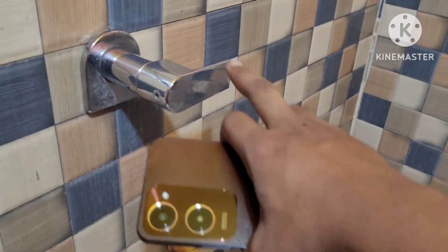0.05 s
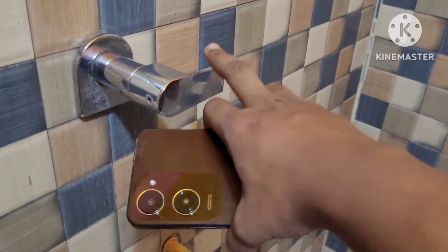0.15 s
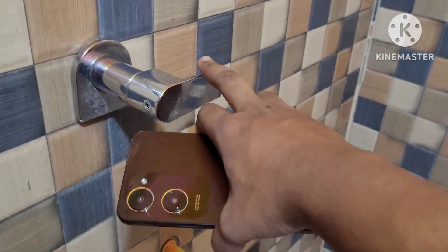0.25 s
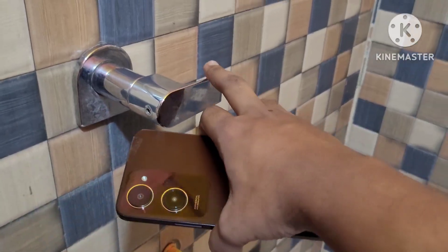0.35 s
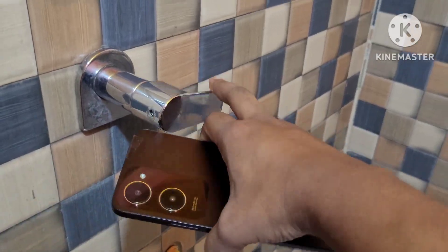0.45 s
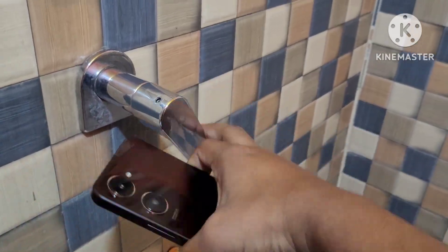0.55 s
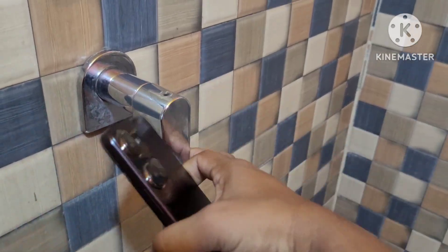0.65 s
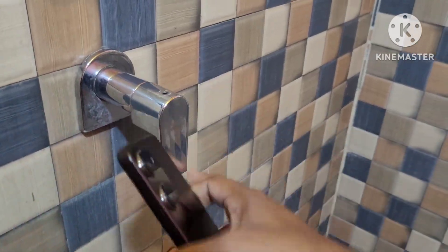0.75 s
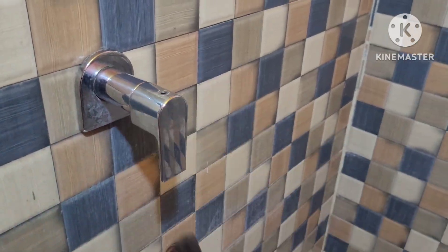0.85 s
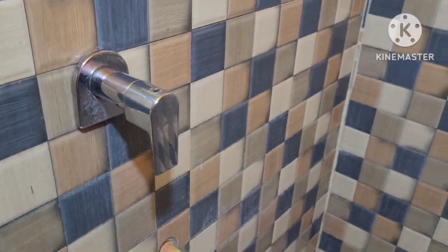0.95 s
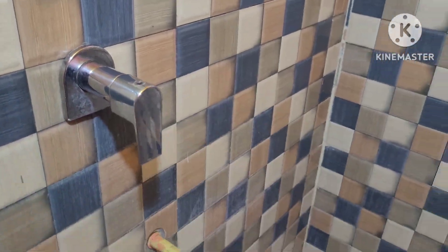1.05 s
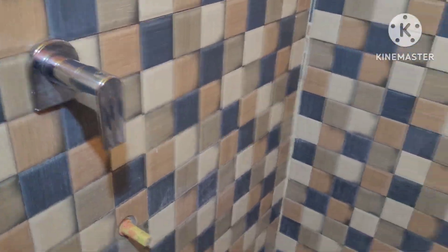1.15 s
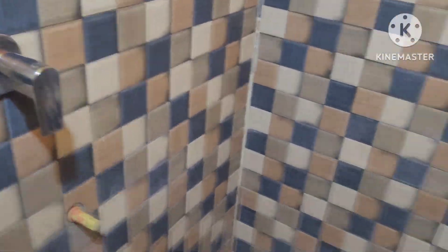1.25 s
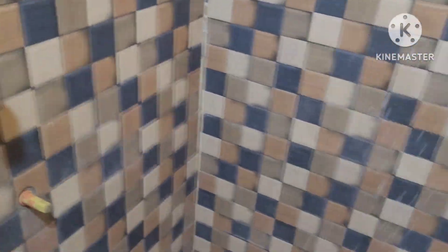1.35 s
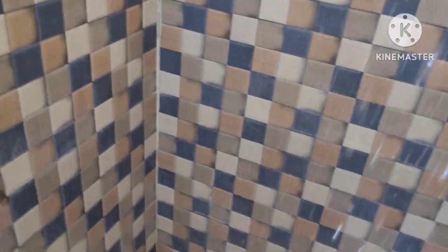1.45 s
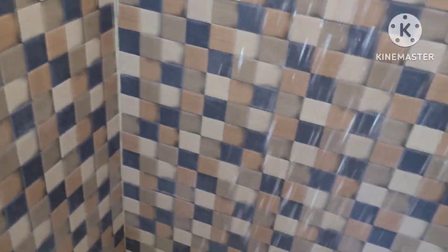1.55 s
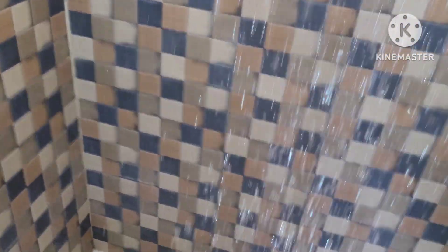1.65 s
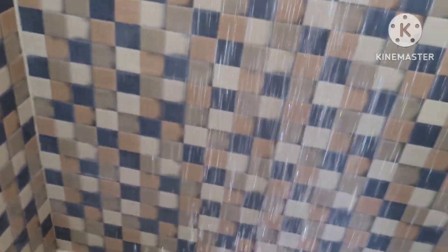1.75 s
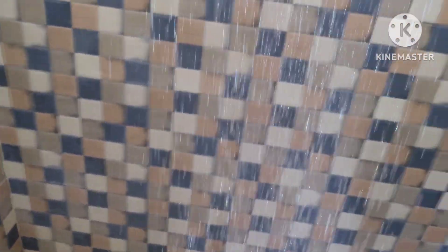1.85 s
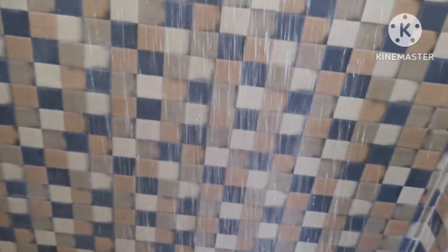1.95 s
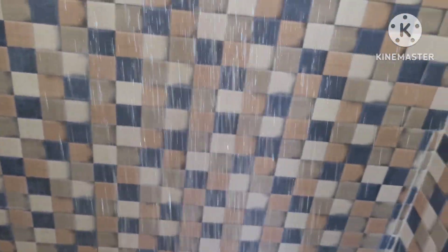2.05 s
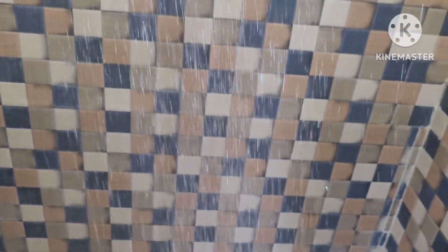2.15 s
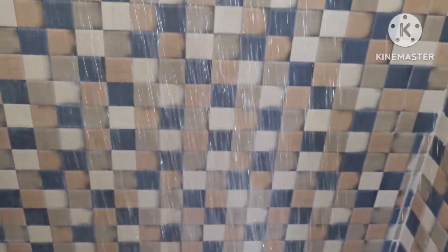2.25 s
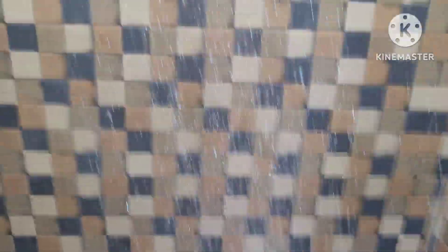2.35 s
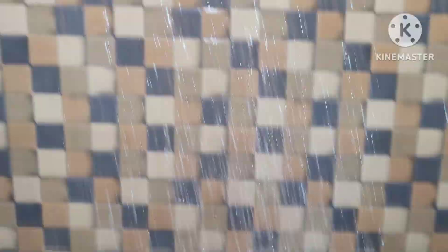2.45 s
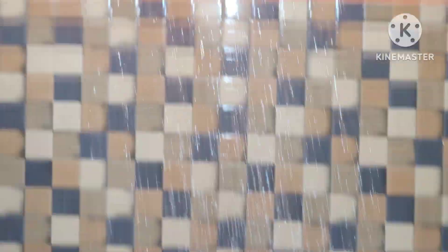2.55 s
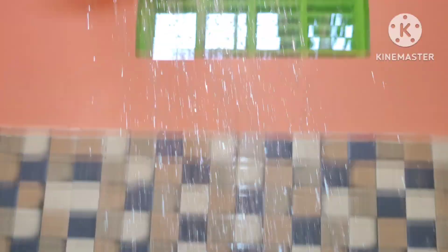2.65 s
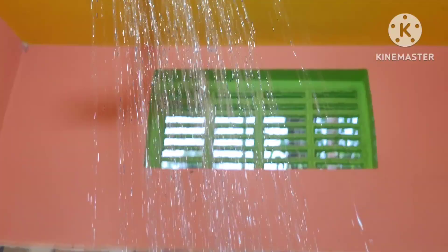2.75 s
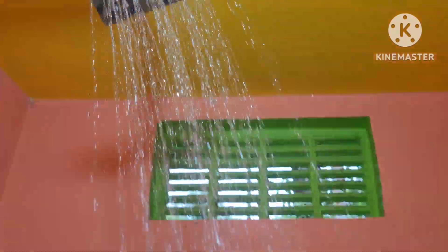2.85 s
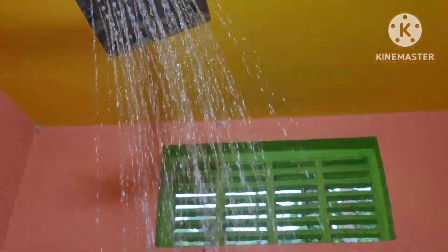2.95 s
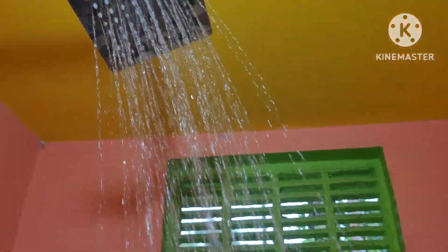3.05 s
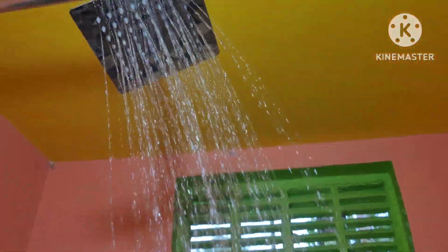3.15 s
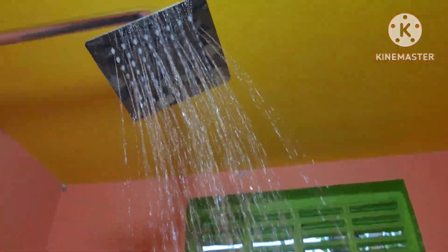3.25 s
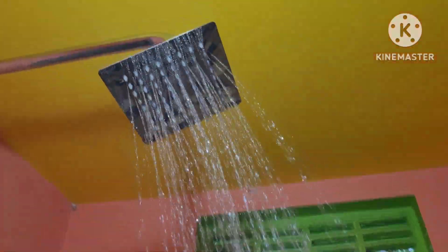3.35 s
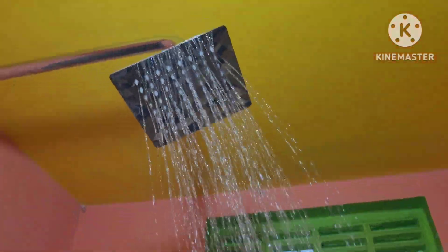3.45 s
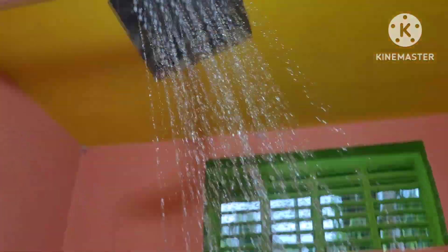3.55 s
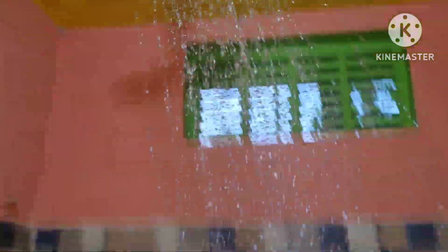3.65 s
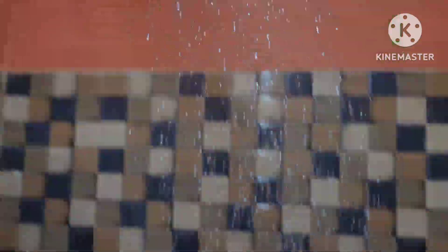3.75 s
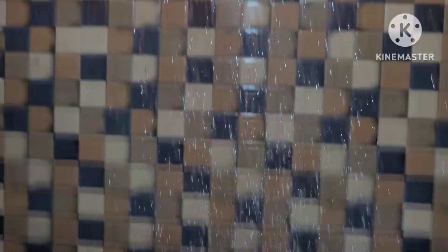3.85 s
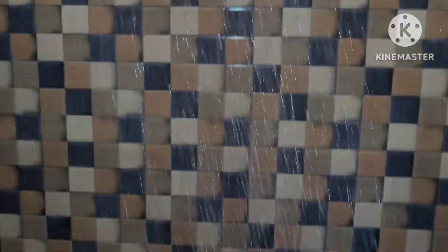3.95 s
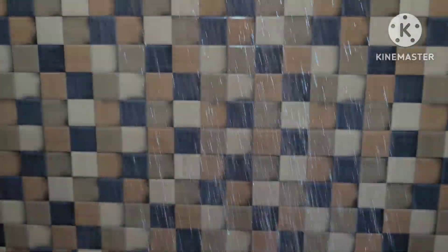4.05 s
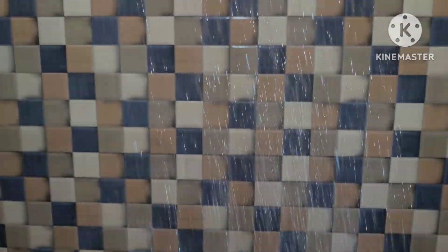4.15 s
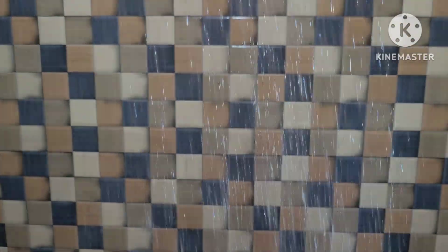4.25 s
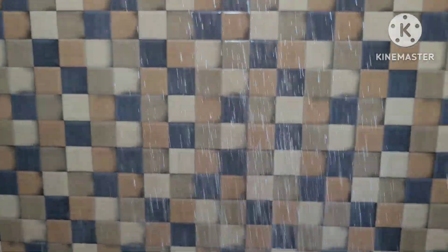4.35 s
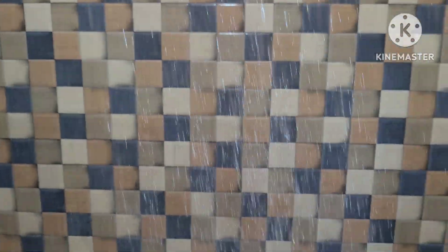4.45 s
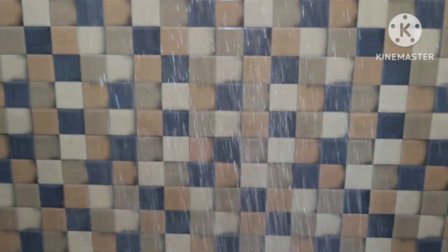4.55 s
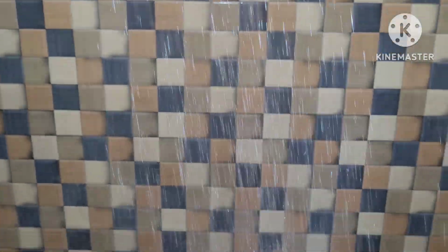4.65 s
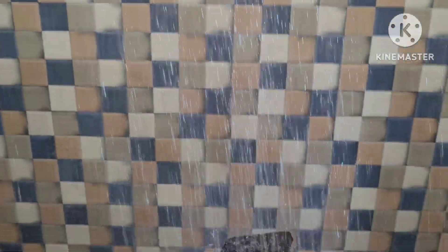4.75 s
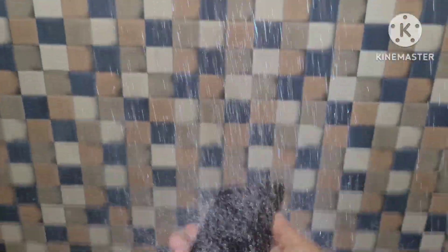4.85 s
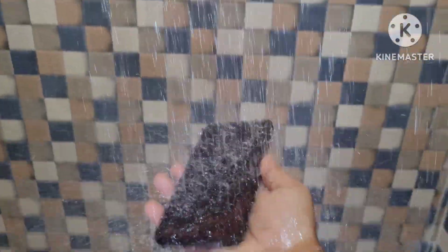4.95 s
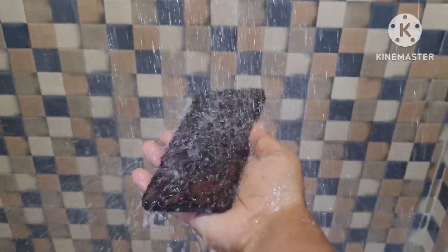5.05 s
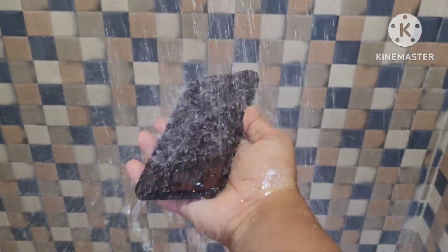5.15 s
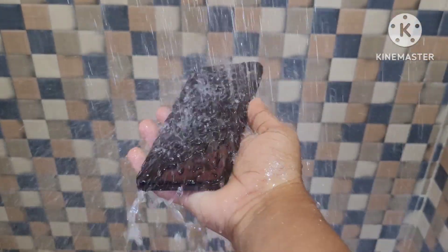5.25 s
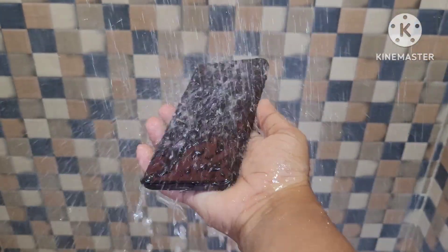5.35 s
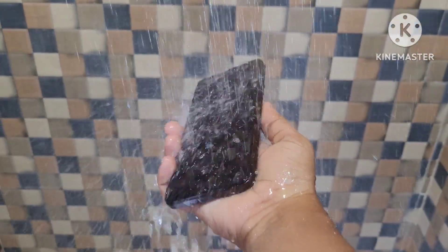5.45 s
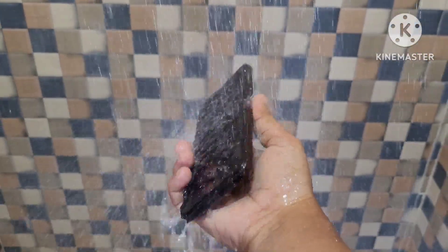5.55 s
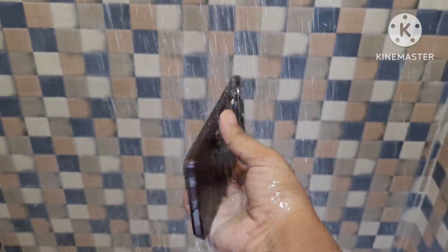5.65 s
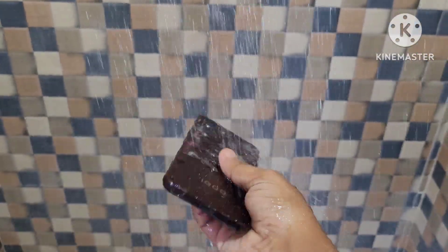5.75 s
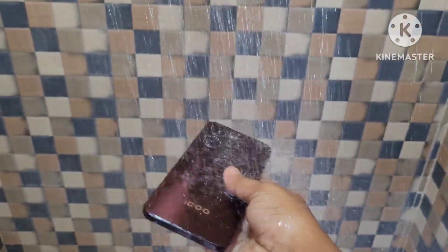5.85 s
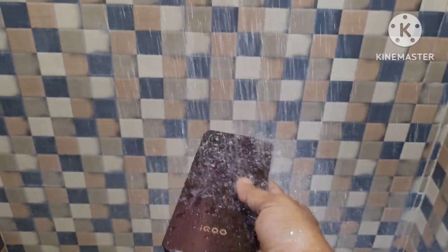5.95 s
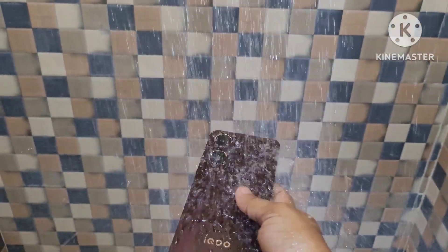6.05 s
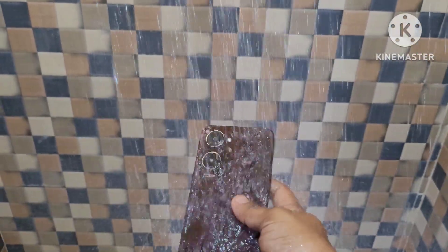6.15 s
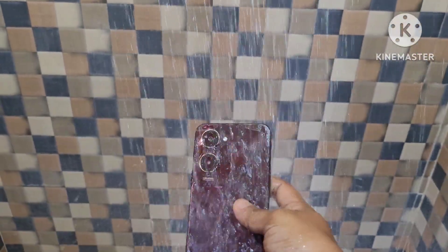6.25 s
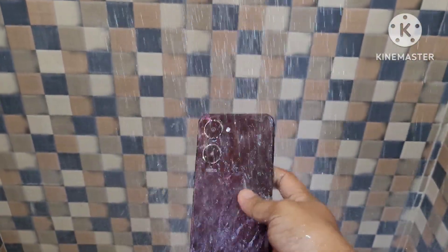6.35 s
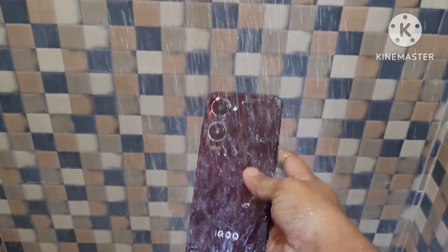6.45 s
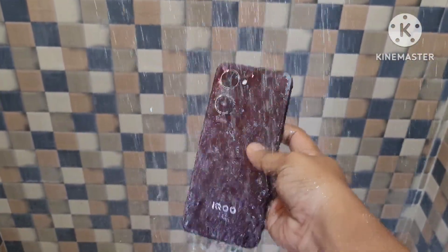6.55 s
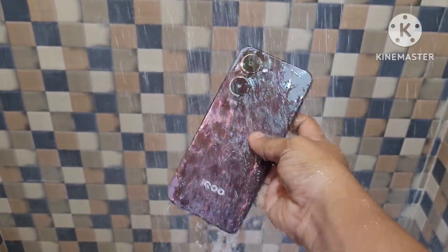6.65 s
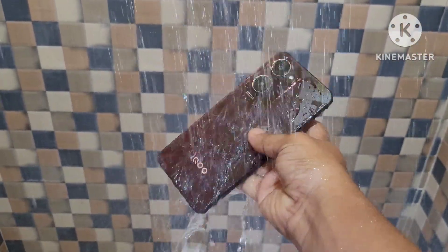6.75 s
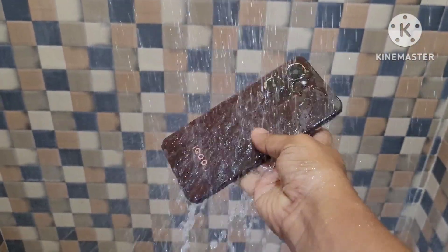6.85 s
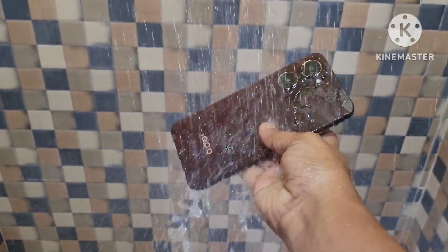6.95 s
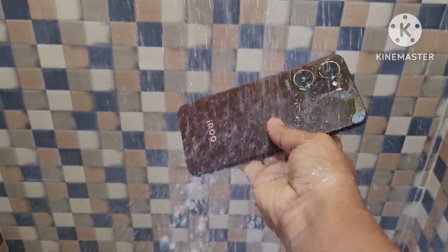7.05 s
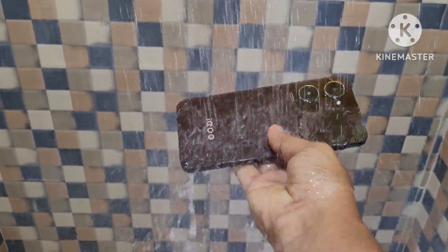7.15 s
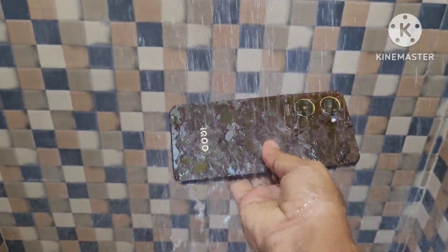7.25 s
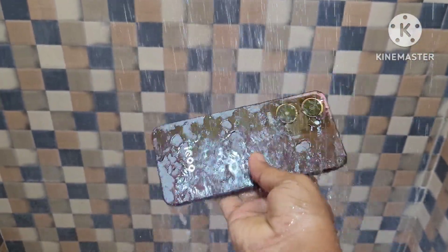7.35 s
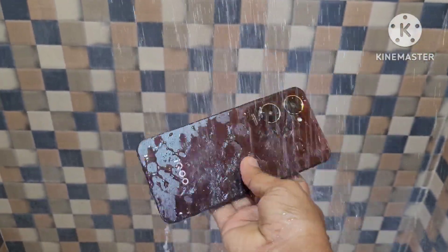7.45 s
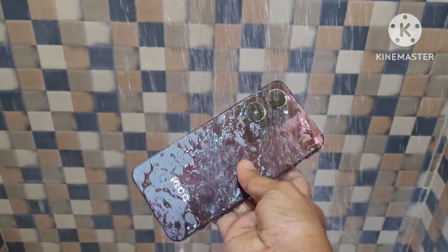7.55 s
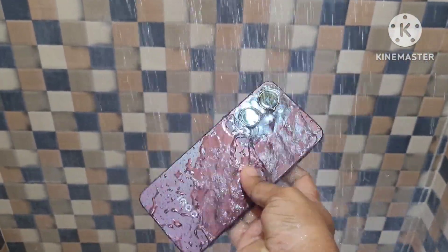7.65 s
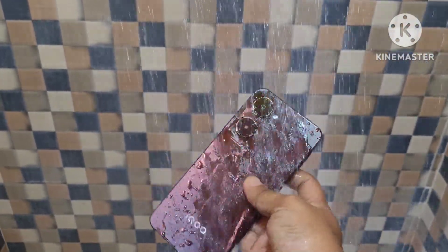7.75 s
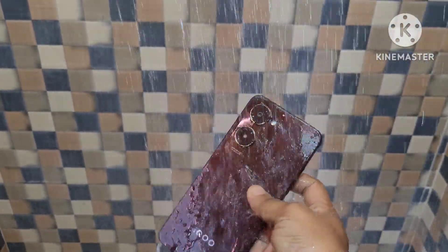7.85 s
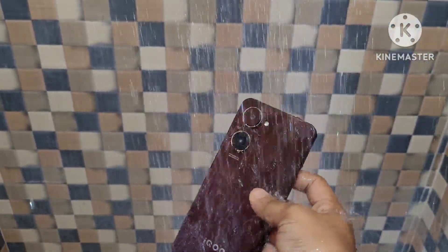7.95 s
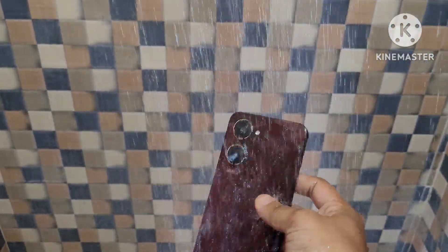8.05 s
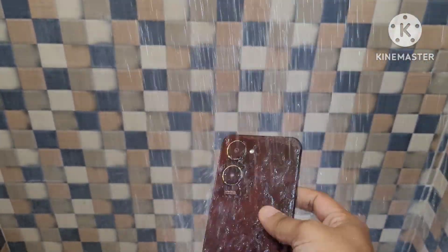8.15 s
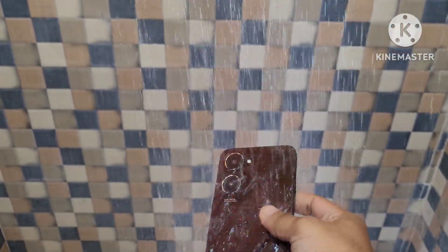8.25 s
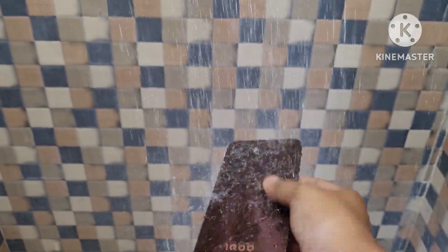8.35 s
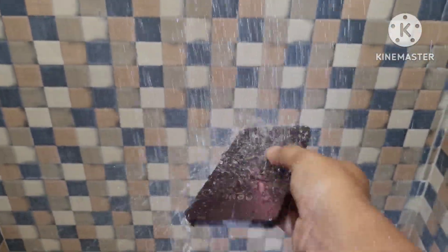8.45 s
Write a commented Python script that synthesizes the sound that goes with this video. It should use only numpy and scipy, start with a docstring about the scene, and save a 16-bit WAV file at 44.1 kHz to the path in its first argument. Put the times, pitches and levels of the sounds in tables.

```python
"""A shower runs in a small tiled bathroom. The camera is jostled, the tap lever scrapes, a first gush
slaps the floor, and the spray settles into a hiss of fine drops that patter on the ringing floor.
A phone is then held in the jets: water drums with a hollow note and spills off it in separate splashes.
Two stray drops tap the camera; a faint hum lies underneath."""
import sys
import numpy as np
from scipy import signal
from scipy.fft import rfft, irfft, next_fast_len
from scipy.io import wavfile
from scipy.ndimage import uniform_filter1d

SR = 44100
rng = np.random.default_rng(int(sys.argv[2]) if len(sys.argv) > 2 else 0)


def int16_out(signal):
    """Quantize to a 16-bit WAV file."""
    q = np.round(np.clip(np.atleast_2d(signal).T, -1, 1) * 32767)
    wavfile.write(sys.argv[1], SR, q.astype(np.int16))


N = 375291
OPENING = 3 * SR  # samples spanning handling, lever and gush
SPATTER_START_S, SPATTER_ATTACK_S, SPRAY_START_S = 1.1104, 0.036, 1.735

# impact of the heavier water: (time [s], relative drumming [dB], relative spatter [dB])
STREAM_LEVELS = [(1.7, -58, -47), (1.83, -66, -58), (1.85, -62, -46), (2.04, -63, -55), (2.15, -71, -58.5),
                 (2.49, -68, -69), (2.95, -72.5, -63), (4.24, -66.5, -59.5), (4.56, -59, -54),
                 (5.39, -55.5, -51), (5.73, -63.5, -58.5), (5.79, -62, -44.5), (5.88, -50.5, -47),
                 (6.2, -51, -46.5), (6.41, -59, -52.5), (6.9, -53, -45.5), (7.2, -50.5, -42),
                 (7.42, -53, -48.5), (8.21, -57, -50), (8.5, -49.5, -46)]


def amp(db):
    """Decibels to gain."""
    return np.exp(np.asarray(db) * (np.log(10) / 20))


def unit(x):
    """Stereo pair scaled to mid rms 1."""
    return x / np.sqrt(np.mean(x.mean(0) ** 2) + 1e-20)


def along(points, hz):
    """Interpolate (frequency [Hz], value) points on a log axis."""
    f, v = np.transpose(points)
    return np.interp(np.log(hz + 1), np.log(f), v)


def gains(rows, rise_s, fall_s, size=N):
    """Gain curve per dB column, fading in before the first row and out after the last."""
    s, *columns = np.transpose(rows)
    t = np.arange(size) / SR
    outside = np.maximum(s[0] - t, 0) / rise_s + np.maximum(t - s[-1], 0) / fall_s
    return [amp(np.interp(t, s, db)) * np.exp(-np.minimum(outside, 20)) for db in columns]


def envelope(start_s, hold_s, attack_s, release_s, size=N):
    """Exponential rise, hold, exponential release."""
    t = np.maximum(np.arange(size) / SR - start_s, 0)
    return (1 - np.exp(-t / attack_s)) * np.exp(-np.minimum(np.maximum(t - hold_s, 0) / release_s, 20))


def wobble(rate_hz):
    """Piecewise-linear random curve."""
    knots = rng.standard_normal(int(N * rate_hz / SR) + 2)
    return np.interp(np.arange(N) * rate_hz / SR, np.arange(len(knots)), knots)


def filtered(x, response):
    """Apply a frequency response by FFT."""
    n = x.shape[-1]
    m = next_fast_len(n + SR // 8)
    return irfft(rfft(x, m) * response(np.fft.rfftfreq(m, 1 / SR)), m)[..., :n]


def coloured(x, spectrum):
    """Shape by a dB spectrum, then normalise."""
    return unit(filtered(x, lambda hz: amp(along(spectrum, hz))))


def resonance(f, hz, width_hz):
    """Response of one damped mode."""
    return 1j * f * width_hz / (hz * hz - f * f + 1j * f * width_hz)


def drops(per_s, spread_db, size=N, lag_s=.00014, scatter_s=.00016):
    """Random impacts at rms 1, each with its own size and left-right delay."""
    at = np.flatnonzero(rng.random(size) < per_s / SR)
    weight, sign, place = rng.standard_normal((len(at), 3)).T
    blow = amp(spread_db * np.minimum(weight, 2.5)) * np.sign(sign)
    delay = np.round((lag_s + scatter_s * place) * SR).astype(int)
    left = np.bincount(np.clip(at + delay, 0, size - 1), blow, size)
    pair = np.array([left, np.bincount(at, blow, size)])
    return pair / np.sqrt(np.mean(pair ** 2) + 1e-20)


def burst(per_s, spread_db, attack_s, decay_s, hold_s=0):
    """Short cluster of impacts."""
    size = SR // 2
    return drops(per_s, spread_db, size) * envelope(0, hold_s, attack_s, decay_s, size)


def standing_waves(gain_db, t60_s):
    """Impulse response of the modes between the tiled walls."""
    # wall modes: (frequency [Hz], relative level [dB])
    wall_modes = [(108, -0.5), (172, -0.5), (205, -4), (337, -4.5), (450, -7), (530, -8.5), (781, -1),
                  (885, -8), (1030, -8.5), (1069, -8.5), (1170, -6), (1328, -16), (1684, -5), (1810, -8),
                  (1916, -2)]
    t = np.arange(SR * 2 // 3) / SR
    ring = np.zeros((2, len(t)))
    for hz, db in wall_modes:
        phase = rng.uniform(0, 2 * np.pi) + rng.normal(0, 1.0, (2, 1))
        ring += amp(db) * np.sin(2 * np.pi * hz * t + phase)
    ring *= amp(-60 * t / t60_s)
    return amp(gain_db) * ring / np.linalg.norm(ring[0])


def room_tail():
    """Diffuse tile reflections: left and right alike in the bass, nearly unrelated in the treble."""
    # room decay: (frequency [Hz], t60 [s])
    decay = [(150, 0.38), (1000, 0.67), (4000, 0.43), (8000, 0.55), (15000, 0.026)]
    # left-right likeness: (frequency [Hz], coherence [0-1])
    coherence = [(100, 0.81), (250, 0.98), (450, 0.98), (1000, 0.29), (1800, 0), (4000, 0.14)]
    hz, t, z = signal.stft(rng.standard_normal((2, SR * 2 // 3)), SR, nperseg=256)
    angle = np.arccos(np.clip(along(coherence, hz), -1, 1))[:, None] / 2
    t60_s = along(decay, hz)[:, None]
    mid, side = z * amp(-60 * t / t60_s) * np.array([np.cos(angle), np.sin(angle)])
    tail = signal.istft(np.array([mid + side, mid - side]), SR, nperseg=256)[1]
    return tail / np.linalg.norm(tail[0])


def in_room(x, wet_db, ring=0):
    """Direct sound plus reverberation; a fresh tail for each spot."""
    tail = room_tail()[:, :SR * 2 // 3] + ring
    return x + amp(wet_db) * signal.oaconvolve(x[:1], tail, axes=1)[:, :x.shape[1]]


def background():
    """Still air and a faint hum."""
    # hum partials: (frequency [Hz], level [dB])
    partials = [(54, -87.5), (108, -91), (167, -90), (323, -88)]
    # air spectrum: (frequency [Hz], relative level [dB])
    air_eq = [(15, -38.5), (25, -17), (113, -20), (137, -11), (254, -5), (951, -19.5), (4190, -26),
              (5790, -10.5), (11400, -37.5), (13400, -13), (15700, -31)]
    t = np.arange(N) / SR
    hum = sum(amp(db) * np.sin(2 * np.pi * hz * t + 0.3 * wobble(1.5)) for hz, db in partials)
    return hum + amp(-77.5) * coloured(rng.standard_normal((2, N)), air_eq)


def handling():
    """Fingers shift on the camera: body rumble and rubbing."""
    # grip: (time [s], relative rumble [dB], relative rub [dB])
    grip = [(0.0, -41, -53.5), (0.018, -31, -51), (0.15, -32.5, -51.5), (0.25, -41, -61)]
    # spectra: (frequency [Hz], relative level [dB])
    rumble_eq = [(20, -17), (38, -0.5), (60, 2), (141, -15.5), (362, -30.5), (500, -51), (650, -69),
                 (1100, -120)]
    rub_eq = [(210, -28), (350, -8), (3020, -27.5), (4000, -38), (9660, -52.5), (10600, -33.5),
              (15000, -69.5)]
    rumble_gain, rub_gain = gains(grip, rise_s=.01, fall_s=.003, size=OPENING)
    rumble = rumble_gain * coloured(rng.standard_normal((2, OPENING)), rumble_eq)
    rub = rub_gain * coloured(drops(3000, 1.3, OPENING), rub_eq)
    return amp(4.0) * rumble + amp(2.5) * rub


def camera_taps():
    """A dull knock thumps the camera body; then two stray drops tick and ring it."""
    # taps: (time [s], level [dB], ring [Hz], tick over ring [ratio], left over right [dB])
    taps = [(0.168, -10, 156, 0, 18), (2.476, -39, 125, 3.5, 22), (2.5046, -34.5, 128, 3.5, 31)]
    out, t = np.zeros((2, OPENING)), np.arange(SR // 10) / SR
    for s, db, hz, tick, pan_db in taps:
        tap = tick * np.exp(-t / 0.00021) - np.sin(2 * np.pi * hz * t) * np.exp(-t / 0.0035)
        add(out, s, amp(db) * tap * amp([[0], [-pan_db]]))
    return out


def tap_lever(ring):
    """The lever scrapes in short, uneven slips with a bright rasp."""
    # slips: (time [s], relative scrape [dB], relative rasp [dB])
    slips = [(0.606, -67.5, -84), (0.638, -59, -76), (0.671, -59, -53), (0.72, -58, -63),
             (0.787, -53, -49.5), (0.87, -71, -51), (0.943, -63.5, -82)]
    # spectra: (frequency [Hz], relative level [dB])
    scrape_eq = [(300, -16), (700, -1), (1000, -1.5), (1390, 5), (1600, -4), (1800, 3), (2500, -1.5),
                 (5000, -4), (7500, -9), (11000, -27), (13500, -6), (15700, -8.5)]
    rasp_eq = [(6000, -10), (8000, -2), (9400, 5), (10700, -13), (13500, -18), (15700, -23)]
    scrape, rasp = np.zeros((2, 2, OPENING))
    for s, scrape_db, rasp_db in slips:
        add(scrape, s, amp(scrape_db) * burst(1200, 4, attack_s=.022, decay_s=.036))
        add(rasp, s, amp(rasp_db) * burst(2100, 4, attack_s=.002, decay_s=.016))
    scrape = filtered(scrape, lambda hz: amp(along(scrape_eq, hz) + 12.0))
    rasp = filtered(rasp, lambda hz: amp(along(rasp_eq, hz) + 8.0))
    return in_room(scrape, wet_db=-2.5, ring=ring) + in_room(rasp, wet_db=-5.5)


def pipe_murmur():
    """Water filling the pipe makes a low murmur that rings the room's low modes."""
    # filling: (time [s], level [dB])
    levels = [(0.6, -87), (0.708, -67.5), (0.83, -64.5), (1.06, -70.5)]
    # low room modes: (frequency [Hz], width [Hz], relative level [dB])
    modes = [(108, 7.7, -7), (183, 8, 0), (218, 10, -20), (286, 42, -12)]
    flow = rng.standard_normal(OPENING) + .5 * rng.standard_normal((2, OPENING))
    murmur = filtered(flow, lambda f: sum(amp(db) * resonance(f, hz, width) for hz, width, db in modes))
    return gains(levels, rise_s=.03, fall_s=.18, size=OPENING)[0] * unit(murmur)


def gush(ring):
    """The first slugs hit the bare floor and throw up spatter; each traps air at its own pitch."""
    # slugs: (time [s], length [s], relative thud [dB], relative slap [dB], air pocket [Hz])
    slugs = [(1.096, 0.033, -38.5, -54, 766), (1.127, 0.02, -27, -40.5, 1060),
             (1.169, 0.037, -31, -38.5, 1164), (1.287, 0.051, -36, -32.5, 1295),
             (1.331, 0.074, -31.5, -36, 1706)]
    # spectra: (frequency [Hz], relative level [dB])
    thud_eq = [(40, -19), (75, -30), (108, -2.5), (140, -32), (185, -3), (240, -8), (335, -3), (520, -3.5),
               (750, 2), (1400, 4), (1900, -39)]
    slap_eq = [(900, -33), (1250, -15), (1500, 1), (1850, 4), (2200, -1.5), (2800, -8), (5000, -50)]
    spatter_eq = [(1200, -19.5), (2300, -3.5), (4200, -3), (6500, -9), (9000, -18), (11000, -34),
                  (14000, -32), (16000, -29.5)]
    attack_s, release_s, fade_db_per_s = .0062, .015, 28
    lumps = drops(1100, 3.8, OPENING)
    thud, slap = coloured(lumps, thud_eq), coloured(lumps, slap_eq)
    age_s = np.arange(OPENING) / SR - SPATTER_START_S
    hold_s = SPRAY_START_S - SPATTER_START_S
    spatter = coloured(drops(3000, 2.6, OPENING), spatter_eq) * amp(-31.5 - fade_db_per_s * age_s)
    spatter *= envelope(SPATTER_START_S, hold_s, SPATTER_ATTACK_S, release_s, OPENING)
    impacts, pockets = np.zeros((2, 2, OPENING))
    for s, length_s, thud_db, slap_db, hz in slugs:
        landing = envelope(s, length_s, attack_s, release_s, OPENING)
        impacts += landing * (amp(thud_db) * thud + amp(slap_db) * slap)
        pocket = unit(filtered(lumps, lambda f: resonance(f, hz, width_hz=144) ** 2))
        pockets += in_room(amp(thud_db + 2) * landing * pocket, wet_db=-3.5)
    return amp(-7.5) * (in_room(impacts + spatter, wet_db=1.5, ring=ring) + pockets)


def force_db():
    """Drumming level relative to its mean."""
    s, drum_db, _ = np.transpose(STREAM_LEVELS)
    level_db = np.interp(np.arange(N) / SR, s, drum_db)
    return level_db - level_db[round(s[0] * SR):].mean()


def gurgling(x, patchy_db):
    """Water pockets resonate briefly: random gain patches in time and frequency."""
    z = signal.stft(x, nperseg=512)[2]
    patches = uniform_filter1d(rng.standard_normal(z.shape[1:]), size=3, axis=0)
    patches = uniform_filter1d(patches, size=14, axis=1)
    return unit(signal.istft(z * amp(patchy_db * patches / patches.std()), nperseg=512)[1][:, :N])


def spray():
    """Thousands of fine drops a second: near ones tick, far ones merge into a sizzle."""
    # the tilting phone screens or reflects the hiss: (time [s], length [s], gain [dB], turn time [s])
    tilts = [(4.653, 0.23, -6.5, .06), (5.17, 0.3, 3.5, 0.025), (5.75, 0.25, 3.5, 0.014),
             (6.064, 0.36, -6, 0.046), (8.324, 0.16, 1.5, 0.0197)]
    # spectra: (frequency [Hz], relative level [dB])
    mist_eq = [(5000, -26), (8000, -4.5), (9300, -2), (11000, -7.5), (13000, 1), (14500, 3), (16000, 2)]
    sizzle_eq = [(1500, -39.5), (3000, -5.5), (4500, 0.5), (6000, 5), (7500, 2), (9500, -1), (11000, -62),
                 (16000, -30)]
    attack_s = .019
    tilt_db = sum(db * envelope(s, length_s, turn_s, turn_s) for s, length_s, db, turn_s in tilts)
    surge_db = 3 * envelope(SPRAY_START_S, hold_s=.39, attack_s=attack_s, release_s=.025)
    age_s = np.maximum(np.arange(N) / SR - SPRAY_START_S, 0)
    flow = (1 - np.exp(-age_s / attack_s)) * amp(surge_db)
    gush_s = SPRAY_START_S - SPATTER_START_S
    gush_mist = amp(-7.5) * envelope(SPATTER_START_S, gush_s, SPATTER_ATTACK_S, attack_s)
    mist = coloured(drops(5000, 3.4) + amp(3.5) * rng.standard_normal((2, N)), mist_eq)
    mist *= (flow + gush_mist) * amp(-42 + .5 * tilt_db + .036 * force_db())  # spread wide: half the tilt
    sizzle = coloured(drops(2500, 2.1) + amp(3.0) * rng.standard_normal((2, N)), sizzle_eq)
    sizzle = gurgling(sizzle, patchy_db=1.7) * flow * amp(-46.18 + tilt_db + .2 * force_db())
    jet_flutter_db, sizzle_flutter_db = 1.15 * wobble(24), .6 * wobble(26)
    return amp(jet_flutter_db) * (mist + sizzle * amp(sizzle_flutter_db))


def floor_ring(x, spread_db, detune=.03):
    """Impacts ring the wet floor; each spot weights and detunes the modes differently."""
    # floor modes: (frequency [Hz], width [Hz], relative level [dB])
    modes = [(389, 22, -7), (610, 9, -1), (1017, 52, -2), (1290, 89, -7), (1750, 130, 5), (2500, 570, 0.5),
             (3500, 340, 0)]
    weight, shift = rng.standard_normal((2, len(modes)))

    def response(f):
        return sum((-1) ** k * amp(db + spread_db * weight[k])
                   * resonance(f, hz * np.exp(detune * shift[k]), width_hz)
                   for k, (hz, width_hz, db) in enumerate(modes))
    rms_gain = np.sqrt(np.mean(abs(response(np.fft.rfftfreq(4096, 1 / SR))) ** 2))
    return filtered(x, response) / rms_gain


def floor_slaps(ring):
    """Single slugs of water slap the floor."""
    # slaps: (time [s], relative level [dB], low-pass [Hz])
    slaps = [(1.546, -24, 2200), (1.689, -26, 3300), (1.713, -32.5, 2000), (1.844, -39, 3500),
             (1.884, -41, 4000), (1.932, -28.5, 2700), (2.022, -40, 3600)]
    out = np.zeros((2, N))
    for s, db, cutoff_hz in slaps:
        blow = burst(5000, 5.1, attack_s=.00045, decay_s=.004)
        slap = filtered(floor_ring(blow, spread_db=1.0), lambda f: 1 / (1 + (f / cutoff_hz) ** 4))
        add(out, s, amp(db) * in_room(slap, wet_db=-5, ring=ring))
    return out


def streams(ring):
    """Heavy drops patter, more with run-off from the phone; gathered streams drum and spatter."""
    # deflection by the phone: (time [s], share [0-1])
    deflection = [(5.65, 0.41), (5.85, 0.64)]
    # spectra: (frequency [Hz], relative level [dB])
    free_eq = [(700, -74), (950, -12), (1080, -5.5), (1350, -3.5), (1550, -1), (1750, -8.5), (2200, -8.5),
               (4000, -37)]
    deflected_eq = [(550, -71), (780, -7), (920, -18), (1030, 3.5), (1120, -11.5), (1350, -3.5),
                    (1650, -5.5), (2200, -1.5), (4000, -55.5)]
    patter_eq = [(100, -45), (160, -18.5), (205, -2), (260, -9.5), (340, 1), (520, 4.5), (620, 2),
                 (790, -0.5), (1100, -15.5), (2000, -41.5)]
    spatter_eq = [(1200, -50), (1700, -9.5), (2000, -7.5), (2600, -3), (3400, -3), (5000, -9), (9000, -30)]
    t = np.arange(N) / SR
    drum_gain, spatter_gain = gains(STREAM_LEVELS, rise_s=.017, fall_s=.1)
    share = np.interp(t, *np.transpose(deflection))
    heavy = in_room(drops(800, 5.24), wet_db=7.5, ring=ring)
    light = in_room(drops(900, 10.0), wet_db=7.5, ring=ring)
    runoff_db = 3 * share
    patter = coloured(heavy, patter_eq) * amp(-64.5 + .47 * force_db() + runoff_db) * (t > SPRAY_START_S)
    drum = (1 - share) * coloured(heavy, free_eq) + share * coloured(heavy, deflected_eq)
    spatter = gurgling(coloured(light, spatter_eq), patchy_db=1.5) * amp(1.35 * wobble(23))
    return patter + amp(2.56) * drum_gain * drum + spatter_gain * spatter


def bubbles(count, median_hz=2400, decay_cycles=6):
    """Trapped air rings briefly, louder when more water spatters."""
    out, t = np.zeros((2, N)), np.arange(SR // 20) / SR
    for s, (weight, pitch) in zip(rng.random(count) * N / SR, rng.standard_normal((count, 2))):
        cycles = median_hz * np.exp(.25 * pitch) * t
        ping = np.sin(2 * np.pi * cycles) * np.exp(-cycles / decay_cycles)
        add(out, s, amp(-2 + 2 * min(weight, 2)) * ping)
    _, spatter_gain = gains(STREAM_LEVELS, rise_s=.02, fall_s=.1)
    return in_room(out * spatter_gain, wet_db=5.5)


def floor_patter(spots):
    """Drops ring several spots of the floor, now more one, now another."""
    # patter: (time [s], level [dB])
    levels = [(1.8, -57), (1.87, -50.5), (2.04, -46.5), (2.13, -62), (2.22, -58.5), (2.42, -61),
              (2.58, -68), (2.76, -55.5), (2.9, -59.5), (3.05, -73), (3.5, -66.5), (3.65, -59), (3.85, -64)]
    out = np.zeros((2, N))
    for _ in range(spots):
        impacts = drops(90, 4.5, lag_s=.00027) * amp(3 * wobble(14))
        out += floor_ring(in_room(impacts, wet_db=-3), spread_db=2)
    return gains(levels, rise_s=.022, fall_s=.092)[0] * unit(out)


def stray_lumps(count, start_s=4.2, length_s=.015):
    """Splash rows for small lumps of random time, level and pitch."""
    times = start_s + (N / SR - start_s) * (np.arange(count) + rng.random(count)) / count
    return [(s, -42.5 + 2.5 * weight, 6560 * np.exp(.21 * pitch), 1, length_s)
            for s, (weight, pitch) in zip(times, rng.standard_normal((count, 2)))]


def splashes(top_hz=10400, clump_hz=120):
    """Lumps spill off phone and hand, bursting into clumps of droplets around one pitch."""
    # spills: (time [s], relative level [dB], pitch [Hz], width over pitch [ratio], length [s])
    spills = [(5.063, -33, 5600, .65, 0.0099), (5.175, -38.5, 6450, 1.3, 0.058),
              (5.234, -28.5, 5800, 1.9, 0.021), (5.273, -30.5, 4800, 0.67, 0.022),
              (5.362, -30.5, 5070, .7, 0.022), (5.575, -36.5, 5830, 1.1, .012),
              (5.65, -30.5, 5730, 0.97, 0.039), (5.704, -29, 5770, 1.36, 0.014),
              (5.755, -29.5, 6600, 1.9, 0.03), (5.787, -26.5, 3780, 0.44, 0.021),
              (5.879, -34.5, 4730, .8, 0.021), (5.977, -34, 5330, .9, 0.034), (6.224, -27, 7300, 1.2, .02),
              (6.357, -34, 6270, 0.91, 0.04), (6.628, -28.5, 5360, 0.67, 0.029),
              (6.718, -31, 5270, 1.2, 0.014), (6.803, -33, 5200, 0.43, 0.031),
              (7.015, -25, 5370, 0.56, 0.014), (7.05, -32, 6000, .61, .025), (7.094, -31, 5100, .62, 0.022),
              (7.169, -33.5, 4420, 1.1, .025), (7.355, -33, 6800, 0.88, 0.024),
              (7.561, -28, 5430, 1.3, 0.019), (7.617, -28, 4370, 0.83, 0.017),
              (7.641, -29.5, 5570, 0.82, 0.02), (7.747, -31, 5560, 0.44, 0.025),
              (8.012, -29.5, 5230, 0.71, 0.018), (8.349, -32, 7500, 1.2, 0.026),
              (8.459, -31.5, 5000, 0.63, 0.032)]
    out = np.zeros((2, N))
    for s, db, hz, width, length_s in spills + stray_lumps(count=12):
        droplets = burst(4400, 3, attack_s=.0011, decay_s=.016, hold_s=length_s)
        t = np.arange(droplets.shape[1]) / SR
        clumps_db = 1.5 * np.interp(t * clump_hz, np.arange(64), rng.standard_normal(64))

        def band(f):  # bounded droplet size: steep edges
            edges = (1 + (f / top_hz) ** 8) * (1 + (.5 * hz / (f + 1)) ** 6)
            return resonance(f, hz, width * hz) ** 2 / edges
        cloud = filtered(droplets * amp(clumps_db), band) * np.sqrt(SR / (width * hz))
        add(out, s, amp(db - 4.5) * in_room(cloud, wet_db=-4.5))
    return out


def hollow_note(width_hz=180):
    """Gathered streams drive one hollow resonance that creeps upward."""
    # note: (time [s], level [dB], pitch [Hz])
    contour = [(4.58, -59, 1300), (5.1, -58, 1350), (5.43, -55.5, 1350), (5.6, -61, 1350)]
    s, db, hz = np.transpose(contour)
    carrier = np.exp(2j * np.pi * np.cumsum(np.interp(np.arange(N) / SR, s, hz)) / SR)
    pole = np.exp(-np.pi * width_hz / SR)
    impacts = in_room(drops(400, 3.9), wet_db=13)
    # shift down, low-pass, shift back: a gliding band-pass
    note = carrier * signal.lfilter([1], [1, -2 * pole, pole ** 2], impacts / carrier)
    return gains(np.transpose([s, db]), rise_s=.045, fall_s=.043)[0] * unit(note.real)


def scene():
    """All sources in one tiled room."""
    ring = standing_waves(gain_db=-15.5, t60_s=.5)
    out = splashes() + background() + spray() + streams(ring) + hollow_note() + bubbles(count=270)
    out += floor_patter(spots=3) + floor_slaps(ring)
    add(out, 0, handling() + camera_taps() + tap_lever(ring) + pipe_murmur() + gush(ring))
    return out


def record(dry):
    """Two band-limited microphone ports, each with its own colour."""
    # port imbalance: (frequency [Hz], left over right [dB])
    imbalance = [(80, 1.5), (200, 1), (740, 0.5), (1220, 2.5), (2010, 2), (3330, 2.5), (5500, 5.5),
                 (7000, 1.5), (9080, -11.5), (11000, -6.5), (15000, -4.5)]
    top_hz = 15750

    def ports(hz):
        pair = amp(np.array([[1], [-1]]) * along(imbalance, hz) / 2)
        return pair / np.sqrt(np.mean(pair ** 2, axis=0)) * (hz < top_hz)
    return filtered(dry, ports)


def add(track, start_s, sound):
    """Mix a sound into a track in place."""
    part = track[:, round(start_s * SR):][:, :sound.shape[-1]]
    part += sound[..., :part.shape[1]]


dry = scene()
out = record(dry)
int16_out(out)
```